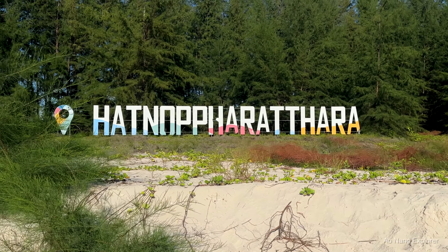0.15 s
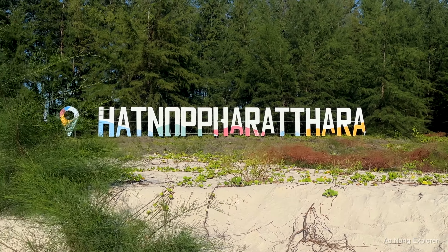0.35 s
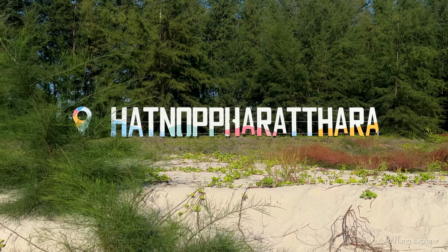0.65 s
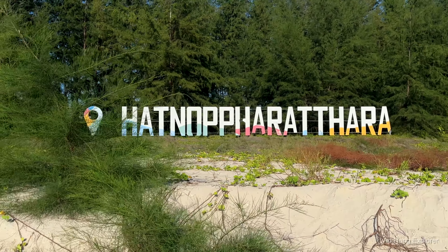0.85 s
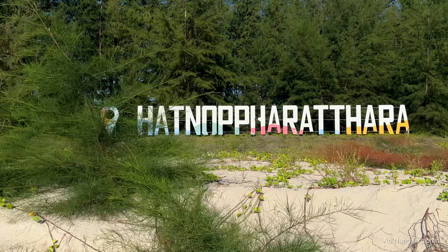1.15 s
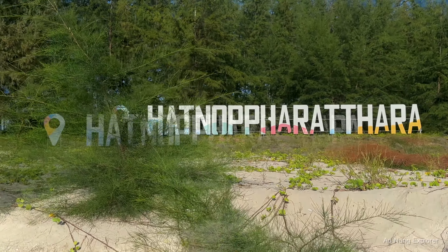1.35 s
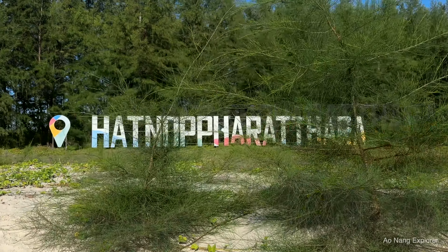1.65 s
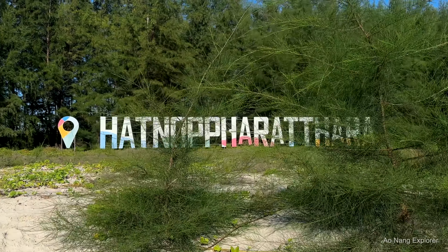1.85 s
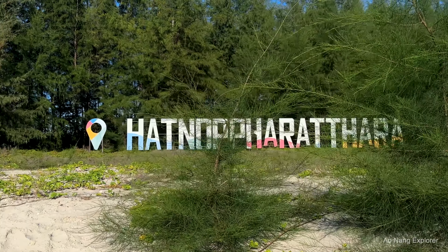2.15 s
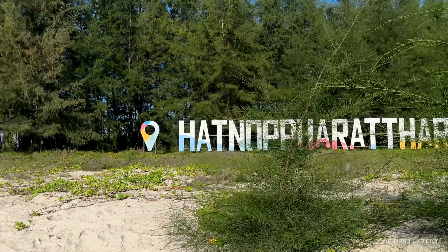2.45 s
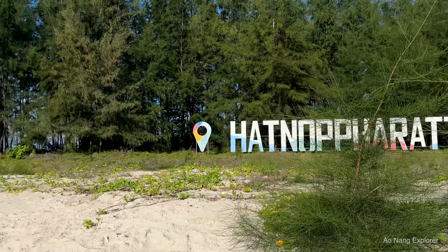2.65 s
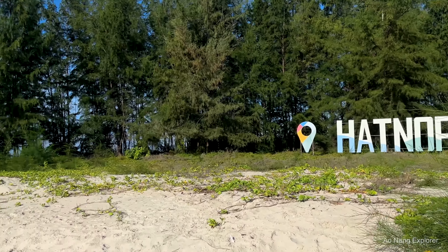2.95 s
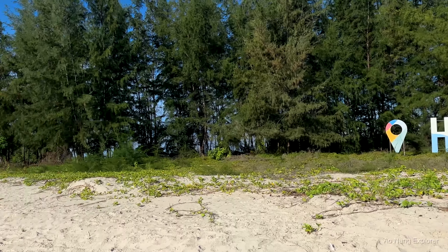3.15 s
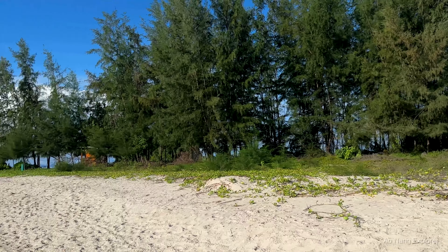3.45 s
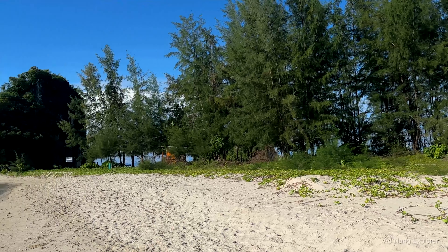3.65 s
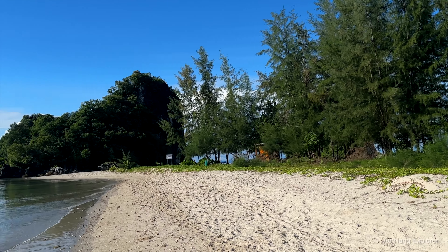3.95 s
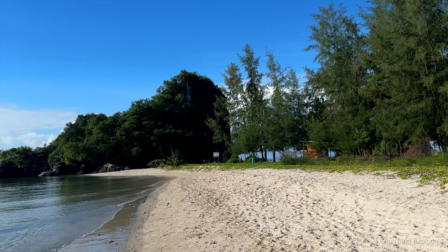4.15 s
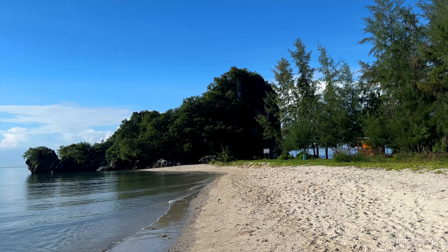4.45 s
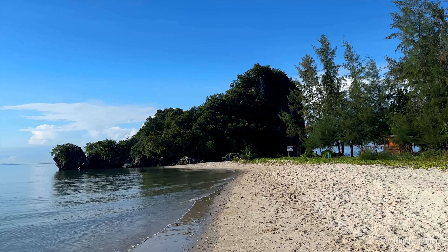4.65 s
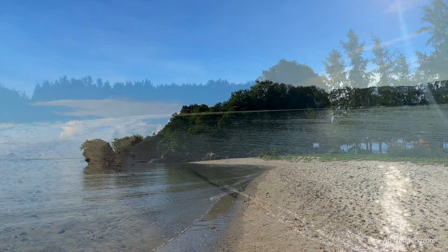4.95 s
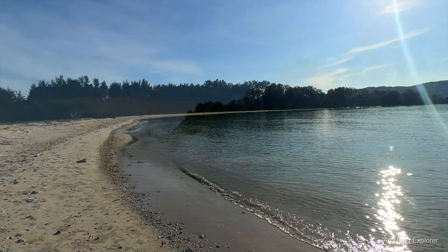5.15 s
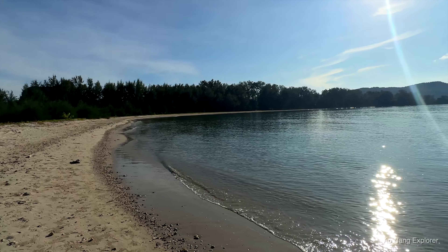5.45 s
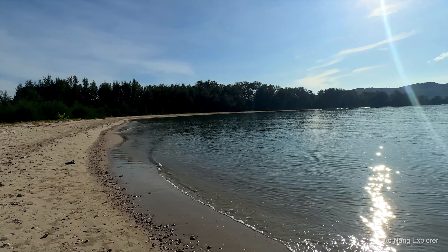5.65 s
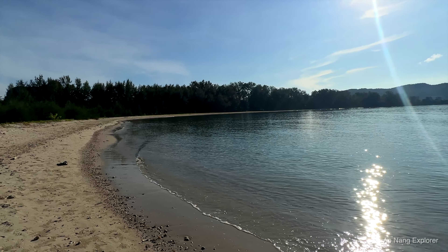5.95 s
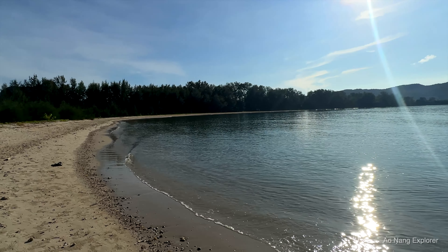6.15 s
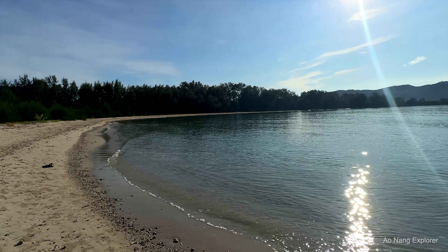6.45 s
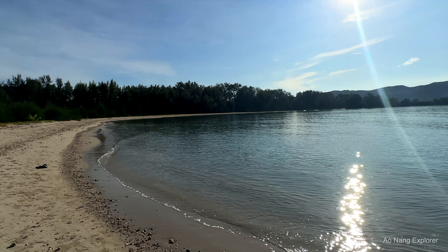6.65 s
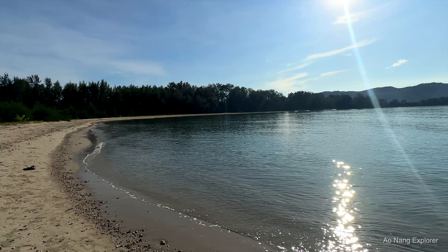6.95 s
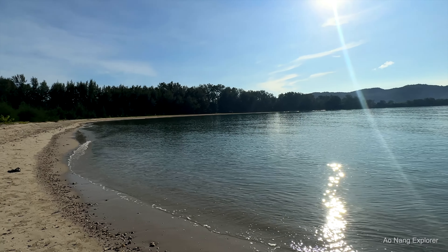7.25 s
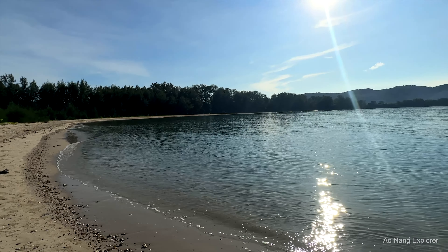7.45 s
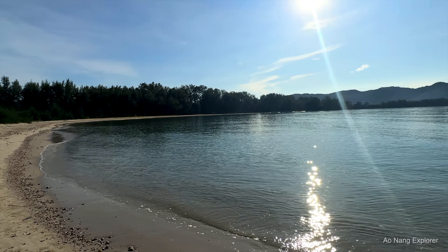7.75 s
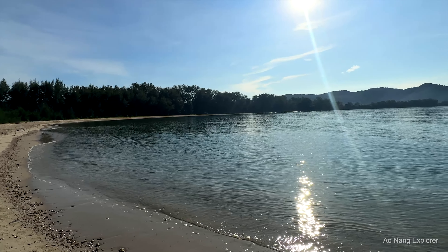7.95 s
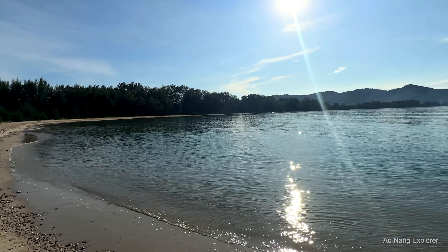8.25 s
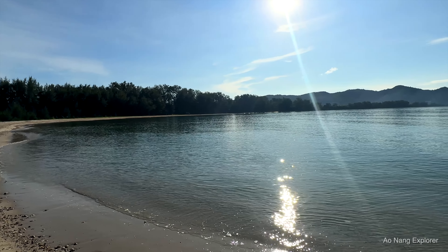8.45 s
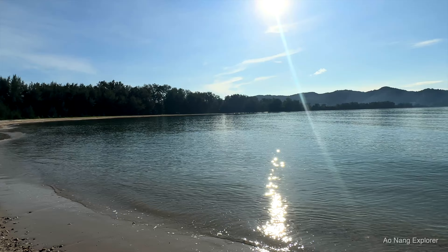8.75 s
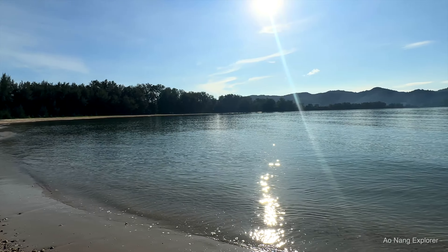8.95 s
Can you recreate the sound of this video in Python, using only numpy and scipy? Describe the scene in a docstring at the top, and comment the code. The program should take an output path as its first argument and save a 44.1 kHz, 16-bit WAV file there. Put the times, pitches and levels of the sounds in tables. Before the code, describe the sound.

Low beating drone of far-off motor boats under soft water wash, bubbly gurgles, a few dry woody clicks and faint high cicadas.

```python
"""A calm sandy bay, heard in turn from among the trees, on the open sand and at the water's edge.
Far long-tail boats drone on the left: harmonics of three firing rates beat over shaped-noise rumble.
Ripples wash, slap and gurgle at the shore: filtered random impulses and noise, with ringing bubbles.
A few dry woody clicks are decaying, falling tones; cicadas are click noise shaped into a shrill band,
with single tones standing out. Two closely spaced microphone ports hear the water from the left."""
import sys
import numpy as np
from scipy import signal
from scipy.fft import rfft, irfft, next_fast_len
from scipy.io import wavfile
from scipy.ndimage import uniform_filter1d

SR = 44100
rng = np.random.default_rng(int(sys.argv[2]) if len(sys.argv) > 2 else 0)


def inscribe(sig):
    """Save sig as 16-bit PCM at rate SR to the path in sys.argv[1].

    A 1-D sig is mono; a 2-D sig holds one channel per row.
    Samples are clipped to [-1, 1] before scaling.
    """
    pcm = np.round(np.clip(np.atleast_2d(sig).T, -1, 1) * 32767)
    wavfile.write(sys.argv[1], SR, pcm.astype(np.int16))


N = 401310
T = np.arange(N) / SR
SIZE = next_fast_len(N)
FREQS = np.maximum(np.arange(SIZE // 2 + 1) * SR / SIZE, 1)

# Engine speed of the three boats: t/s, firing rate f/Hz
LEAD_SPEED = [(0, 100.6), (.3, 101.1), (1.5, 99.7), (1.65, 98.9), (2.55, 97.7), (3.35, 98.9), (3.75, 100.7),
              (4.2, 99.1), (4.9, 99), (5.1, 103), (5.7, 103.2), (6.38, 105.1), (6.7, 103.7), (6.95, 101.1),
              (7.26, 101.1), (7.95, 104.1), (8.6, 104.7), (9.1, 106.4)]
SECOND_SPEED = [(1.5, 86), (1.7, 87), (1.95, 90.7), (2.29, 91), (2.45, 82), (2.7, 76.5), (3.3, 80.3),
                (4.32, 81.5), (4.53, 83.5), (4.82, 90.7), (5.1, 94), (9.1, 94)]
SLOW_SPEED = [(0, 63.6), (1.3, 65), (1.8, 69), (4.85, 72.3), (5.4, 64), (6.5, 60), (7.5, 62), (8.2, 66)]
# Nearest boat's fundamental, then its second harmonic: level/dB at each of the three spots
LEAD_HARMONIC_DB = [-41, -43.5, -28], [-40, -39, -41]
# Brief fades of the nearest boat's fundamental: t/s, half width/s, depth/dB
LEAD_FADES = [(1.581, 0.1, 8), (4.55, 0.21, 16), (6.12, 0.13, 5.5), (7.62, 0.081, 4), (8.9, 0.16, 3.5)]
# Farther boats' fundamentals, swelling and fading across the water: t/s, level/dB
SECOND_LEVEL = [(1.4, -67), (1.54, -34), (1.68, -32.5), (1.92, -41.5), (2.12, -31.5), (2.38, -40),
                (2.8, -39.5), (3.08, -46), (3.22, -37), (3.45, -40.5), (3.62, -33), (3.88, -46),
                (4.15, -34.5), (4.35, -38), (4.55, -34.5), (4.72, -40.5), (4.87, -32), (5.15, -59)]
SLOW_LEVEL = [(0, -44), (1.3, -49.5), (1.8, -41.5), (2.6, -43.5), (4.5, -43.5), (7.6, -50), (8.2, -42.5),
              (9.1, -41)]
# Weak upper exhaust partials: multiple of the firing rate, level/dB at each of the three spots
LEAD_PARTIALS = [(3, -62, -59.5, -58.5), (4, -72, -72, -57.5), (5, -72, -68, -58), (5.5, -54.5, -70, -80),
                 (6, -52, -64, -59.5), (6.5, -54, -69, -78), (7, -59.5, -78, -66)]
SECOND_PARTIALS = [(3, -90, -58.5, -60), (4, -90, -62, -69)]
# Blurred rumble of farther boats, spectral shape: f/Hz, relative level/dB per Hz
RUMBLE_SPECTRUM = [(20, -43), (32, -21), (45, 6), (60, 7), (85, 13.5), (115, 7), (160, 4), (230, -1),
                   (330, -11.5), (600, -49.5)]
# Rumble: level/dB at each of the three spots
RUMBLE_DB = [-43, -43.5, -41]
# Boats, left minus right: level/dB at each of the three spots
BOAT_LEFT_DB = [2.8, 3, 1.5]
# Farther boats' second harmonics at each of the three spots (dB)
SECOND_OCTAVE_DB, SLOW_OCTAVE_DB = [-85, -53, -44.3], [-60, -65, -59]


def boats():
    """Beating: three engines at different speeds interfere over a dull, partly diffuse rumble."""
    first_db, second_db = map(by_spot, LEAD_HARMONIC_DB)
    first_db = first_db - sum(db * swell(s, width) for s, width, db in LEAD_FADES)
    lead = exhaust(curves(LEAD_SPEED)[0], first_db, second_db, LEAD_PARTIALS,
                   flutter_db=0.6, waver_db=2.0)
    second = exhaust(curves(SECOND_SPEED)[0], curves(SECOND_LEVEL)[0], by_spot(SECOND_OCTAVE_DB),
                     SECOND_PARTIALS, flutter_db=2.0, waver_db=0.3)
    slow = exhaust(curves(SLOW_SPEED)[0], curves(SLOW_LEVEL)[0], by_spot(SLOW_OCTAVE_DB), [],
                   flutter_db=1.5, waver_db=7.0)
    # the deepest rumble is alike at both ports; higher up it arrives from all around
    scattered = filtered(rng.standard_normal((2, N)), np.minimum(FREQS / 200, 1))
    rumble = place(grains(900, 1.4), 0.81, 0) + scattered
    rumble = unit(filtered(rumble, shape(RUMBLE_SPECTRUM))) * undb(by_spot(RUMBLE_DB))
    left_db = by_spot(BOAT_LEFT_DB)
    return (place(lead + second + slow, 1.33, 0) + rumble) * undb(np.array([left_db, -left_db]) / 2)


WAVER_HZ = 2.7  # mean rate at which a second harmonic swells on its way across the water


def exhaust(hz, first_db, second_db, partials, flutter_db, waver_db):
    """Harmonic series: distance leaves mainly the low harmonics of the periodic firing pulses."""
    phase = 2 * np.pi * (np.cumsum(hz) / SR + rng.random())
    waver = np.sin(2 * np.pi * WAVER_HZ * T + 2 * walk(2))
    out = undb(first_db + flutter_db * walk(15)) * np.sin(phase)
    out += undb(second_db + flutter_db * walk(17) + waver_db * waver) * np.sin(2 * phase)
    for multiple, *db in partials:
        partial = np.sin(multiple * phase + .2 * walk(4))
        out += undb(by_spot(db) + 1.5 * walk(5)) * partial
    return np.sqrt(2) * out  # levels are rms


# Spectral shapes of water, foam and finest spray: f/Hz, relative level/dB per Hz
WATER_SPECTRUM = [(170, -34), (260, -6), (330, -5), (430, -7.5), (620, -4), (850, -5.5), (1200, -7.5),
                  (1900, -13.5), (2600, -14), (3100, -16), (3550, -18), (4200, -17), (5300, -26),
                  (6500, -38)]
FOAM_SPECTRUM = [(4500, -14), (6500, -6), (7600, 9), (8400, 10.5), (9300, 3.5), (10200, 7), (11800, -9.5),
                 (15000, -22), (16000, -29)]
FIZZ_SPECTRUM = [(7000, -25), (10000, -6), (13500, -2), (15200, -2), (16000, -12)]
# Bands standing out for a while: start t/s, end t/s, centre f/Hz, half width at -6 dB f/Hz, level/dB
WASH_BANDS = [(0, 2.9, 2500, 200, -61), (3.4, 5, 3350, 300, -56), (0, 1.5, 4170, 250, -63),
              (1.5, 2.96, 1460, 140, -53), (3.6, 4.6, 890, 120, -50.5), (3.4, 4.45, 1850, 96, -53.5),
              (3.6, 4.95, 5600, 360, -52), (7, 7.7, 1100, 300, -51.5)]
FROTH_S, FROTH_WIDTH_S = 4.3, 0.88  # the frothiest wash wets the sand: crest and half width
FIZZ_DB, FIZZ_SHARE_DB = -69, -20.5  # added at the frothiest crest; always present, against the foam


def wash():
    """Superposition: countless bubbles and splashes merge to noise whose bands swell independently."""
    body_db, splash_db, foam_db = wash_levels()
    body, splash = np.zeros((2, N)), np.zeros((2, N))
    colour = shape(WATER_SPECTRUM)
    for hz in 250 * 2 ** np.arange(0, 5, .5):
        band = np.cos(np.pi / 2 * np.clip(2 * np.log2(FREQS / hz), -1, 1))
        near = place(grains(2500, 2.44) * undb(2 * walk(22)), 0.87, 4.0 if hz < 1200 else 1.6)
        far = rng.standard_normal((2, N))
        layer = body if hz < 1200 else splash
        layer += filtered(near + far, band * colour)
    droplets = place(grains(6000, 3), 0.693, .3)
    spray = (droplets + undb(2.0) * rng.standard_normal((2, N))) * undb(1.2 * walk(18))
    foam = unit(filtered(spray, shape(FOAM_SPECTRUM))) * undb(foam_db)
    # one frothy ripple throws up extra fine spray
    mist = spray + undb(5) * grains(5000, 2.2) * undb(walk(14))
    fizz_gain = undb(foam_db + FIZZ_SHARE_DB) + undb(FIZZ_DB) * swell(FROTH_S, FROTH_WIDTH_S)
    fizz = unit(filtered(mist, shape(FIZZ_SPECTRUM))) * fizz_gain
    bands = sum(narrow_band(*row, side=0.81, left_db=10.0) for row in WASH_BANDS)
    return unit(body) * undb(body_db) + unit(splash) * undb(splash_db) + foam + fizz + bands


def narrow_band(start, end, hz, width, db, side, left_db):
    """Resonance: a fine, fluttering hiss that fades in and out, part direct and part scattered."""
    resonance = 1 / (1 + 1j * (FREQS - hz) / width) ** 2
    fade = np.clip((T - start) / 0.072 + 1, 0, 1) * np.clip((end - T) / 0.1 + .5, 0, 1)
    clicks = place(grains(1800, 1), side, left_db) + undb(-4) * rng.standard_normal((2, N))
    flutter = undb(2 * walk(32))
    return unit(filtered(clicks, resonance) * flutter) * fade * undb(db)


# Ripples running up the sand: crest t/s, half width/s, body level/dB, splash level/dB, foam level/dB
RIPPLES = [(.8, 0.21, -51, -47.5, -63), (1.22, 0.15, -45, -49.5, -59), (1.505, .035, -59, -52, -58),
           (3.951, 0.43, -50, -48.5, -57.5), (4.72, 0.2, -51, -45.5, -58.5), (7.0, 0.037, -51, -48, -61),
           (7.15, 0.24, -47, -53, -69), (8.501, 0.52, -62, -56, -63)]
# wash between ripples at each of the three spots (dB)
BODY_DB, SPLASH_DB, FOAM_DB = [-45.5, -48, -47], [-48, -48, -47.5], [-66.5, -67, -65]


def wash_levels():
    """Incoherent addition: every ripple adds its power to the resting wash; body, splash, foam in dB."""
    power = undb([by_spot(BODY_DB), by_spot(SPLASH_DB), by_spot(FOAM_DB)]) ** 2
    for s, width, *db in RIPPLES:
        power = power + np.outer(undb(db) ** 2, swell(s, width))
    return 10 * np.log10(power)


def trickle(count=520):
    """Bubble resonance: small bubbles ring at random in the wash, louder where it splashes more."""
    out, splash_db = np.zeros(N), wash_levels()[1]
    for when, pitch, size in rng.random((count, 3)):
        hz = 500 * 8 ** pitch
        db = splash_db[int(when * N)] - 6.5 + 12 * size ** 3
        add(out, when * T[-1], undb(db) * bubble(hz, 45 / hz, rise=0.2))
    return place(out, 0.84, 14.0)


def prickle(count=300):
    """Bubble resonance: tiny bubbles burst one by one on the wet sand, following the splash level."""
    out, splash_db = np.zeros(N), wash_levels()[1]
    for when, pitch, size in rng.random((count, 3)):
        hz = 2200 * 2.4 ** pitch
        db = splash_db[int(when * N)] - 6 + 11 * size ** 3
        add(out, when * T[-1], undb(db) * bubble(hz, 60 / hz, rise=0.11))
    return place(out, 0.54, 2.5)


# bubbles under a ripple: faintest level against its body, middle pitch, t60 in cycles
CHURN_FAINTEST_DB, CHURN_HZ, CHURN_CYCLES = -8.6, 833, 32


def churn(count=26):
    """Air entrainment: each ripple folds air under; pockets ring in a loose cluster round its crest."""
    out = np.zeros(N)
    for s, width, body_db, _, _ in RIPPLES:
        for early, late, pitch, size in rng.random((count, 4)):
            hz = CHURN_HZ * 2 ** (2.6 * (pitch - .5))
            when = np.clip(s + 1.5 * width * (late - early), 0, T[-1])
            db = body_db + CHURN_FAINTEST_DB + 7.4 * size ** 2
            add(out, when, undb(db) * bubble(hz, CHURN_CYCLES / hz, rise=0.22))
    return place(out, 0.45, 7.5)


# Ripples slapping the sand: t/s, relative level/dB, cavity pitch f/Hz, ring t60/s
SLAPS = [(0.4205, -38.5, 1280, 0.05), (0.8225, -39, 2450, 0.02), (1.045, -37, 620, 0.05),
         (1.066, -42, 1000, .03), (1.0825, -28.5, 600, 0.022), (1.12, -38, 520, 0.042),
         (1.1505, -39, 760, .02), (1.211, -29.5, 570, 0.024), (1.227, -36, 600, 0.02),
         (1.272, -42, 720, .03), (1.2987, -30, 730, 0.03), (1.316, -39, 900, .03),
         (1.328, -34.5, 474, 0.05), (1.338, -39, 696, 0.04), (1.357, -40, 680, .03),
         (1.5, -43, 1660, 0.046), (1.519, -37, 450, 0.049), (2.817, -39, 480, 0.038),
         (3.812, -39, 620, 0.048), (4.012, -37.5, 820, 0.03), (4.65, -44, 476, 0.074),
         (4.9, -39.5, 460, 0.04), (6.995, -43, 880, .04), (7.32, -41, 1050, 0.03), (8.737, -40, 1100, 0.03),
         (8.7485, -40, 1970, .026)]
# Air pockets gurgling: t/s, relative level/dB, starting pitch f/Hz, ring t60/s
GURGLES = [(0.823, -41, 2400, 0.035), (.8412, -32, 1380, 0.032), (1.047, -39, 554, 0.051),
           (1.074, -34, 790, 0.038), (1.151, -28.5, 703, 0.04), (1.12, -40, 1550, .035),
           (1.127, -47, 2300, .035), (1.17, -41.5, 2740, 0.052), (1.331, -47, 1330, .05),
           (4.399, -37, 1780, 0.038), (3.645, -40, 1750, 0.034), (3.79, -37, 980, .045),
           (3.875, -44, 1890, .04), (4.095, -35, 900, 0.044), (4.16, -37, 870, .05),
           (4.535, -42, 1920, .05), (1.536, -37, 560, .06), (4.905, -45, 500, 0.061),
           (4.932, -49, 443, .08), (0.795, -38, 1900, 0.039), (1.533, -41, 2750, 0.036),
           (3.845, -37, 960, 0.044), (3.985, -50, 1800, 0.035), (4.635, -43, 2310, 0.041),
           (4.772, -40, 1100, .04), (4.873, -39, 1480, .04), (1.215, -38, 483, 0.069),
           (1.229, -38.5, 321, 0.21), (1.305, -41, 605, 0.1), (1.332, -50, 420, 0.15),
           (1.519, -44, 505, 0.045), (1.552, -38.5, 696, 0.065), (1.5, -51, 1650, .04),
           (2.04, -37, 488, 0.073), (4.38, -42, 1970, 0.06), (4.811, -39.5, 2270, 0.053),
           (7.0, -40, 1830, 0.033), (7.03, -41, 920, 0.046), (7.12, -41, 1145, 0.043),
           (7.319, -54, 1000, 0.028), (8.577, -33, 1270, 0.036), (3.812, -37, 556, 0.046),
           (4.034, -29.5, 332, 0.041), (4.563, -41, 472, 0.094), (4.63, -39, 426, .08),
           (4.665, -39, 370, 0.22), (4.902, -31, 356, 0.16)]
# Tiny bubbles bursting: t/s, relative level/dB, pitch f/Hz, ring t60/s
POPS = [(4.263, -28, 11000, 0.002), (4.612, -41, 8300, .014), (4.703, -26, 8400, 0.0074),
        (4.786, -44, 13100, 0.0037), (4.899, -20.5, 4600, 0.0039), (.877, -33, 5000, .014),
        (.984, -38, 4300, .03), (1.117, -39, 4170, .03), (1.495, -38, 4300, 0.037), (7.0, -47, 10000, .005),
        (7.575, -41, 9400, .005), (8.607, -40, 8600, .014), (8.786, -40, 8800, .009),
        (8.96, -32.5, 3900, 0.011), (9.037, -38, 3770, 0.025)]
# a slap's first contact: pitch above the cavity's, t60, share of pitch lost
KNOCK_ABOVE_HZ, KNOCK_S, KNOCK_SAG = 720, .009, 1.2


def lapping():
    """Impact and cavity resonance: near ripples slap with a falling knock, then gurgle and pop."""
    slaps, gurgles, pops = np.zeros((3, N))
    for s, db, hz, t60 in SLAPS:
        add(slaps, s, undb(db) * bubble(hz + KNOCK_ABOVE_HZ, KNOCK_S, rise=-KNOCK_SAG))
        add(slaps, s + .001, undb(db) * splat(hz, t60, spray_db=-13, crack_db=-20))
        slaps += spill(s, db, hz)
    for s, db, hz, t60 in GURGLES:
        add(gurgles, s, undb(db) * bubble(hz, t60, rise=0.517))
    for s, db, hz, t60 in POPS:
        add(pops, s, undb(db + 2.0) * splat(hz, t60, spray_db=-23, crack_db=-27))
    return place(slaps * undb(6.3) + gurgles * undb(2), 0.88, 10.4) + place(pops, 0.16, .3)


# bubbles after a slap: mean delay, loudest level against it, pitch spread
SPILL_S, SPILL_DB, SPILL_OCTAVES = 0.033, -11.5, 1.86


def spill(s, db, hz, count=7):
    """Air entrainment: a slap folds air under, and a few more pockets ring just after it."""
    out = np.zeros(N)
    for wait, pitch, size in rng.random((count, 3)):
        ring_hz = hz * 2 ** (SPILL_OCTAVES * (pitch - .1))
        ring_db = db + SPILL_DB - 6.1 * size - 4 * pitch
        add(out, s + 2 * SPILL_S * wait, undb(ring_db) * bubble(ring_hz, 22 / ring_hz, rise=0.26))
    return out


def bubble(hz, t60, rise):
    """Damped resonance: a trapped air pocket climbs in pitch near the surface; negative rise falls."""
    t = np.arange(int(SR * max(t60, .002))) / SR
    age = t / t[-1]
    return np.sin(2 * np.pi * hz * t * (1 + rise * age / 2)) * np.exp(-np.log(1000) * age)


def splat(hz, t60, spray_db, crack_db):
    """Impulsive excitation: a brief crack, then a small cavity rings under a fading noise burst."""
    ring = bubble(hz, t60, rise=0.049)
    t = np.arange(len(ring)) / SR
    envelope = undb(spray_db) * np.exp(-7 * t / t60) + undb(crack_db) * np.exp(-t / 0.00032)
    burst = rng.standard_normal(len(t)) * envelope
    low, high = hz * .47, min(hz * 2.6, .46 * SR)
    burst = signal.sosfilt(signal.butter(3, [low, high], "band", fs=SR, output="sos"), burst)
    # the cavity takes about half a cycle to start ringing
    return ring * (1 - np.exp(-2 * hz * t)) + burst * np.sqrt(SR / 2 / (high - low))


# Dry clicks close by: t/s, level/dB, starting pitch f/Hz, ring t60/s, first tick level/dB, its lead t/s
CLICKS = [(0.2500, -22.5, 1300, .016, -35, .0028), (0.3045, -30.5, 1400, 0.011, -46, .001),
          (0.8702, -24, 1450, 0.012, -31, .0005), (0.8778, -33, 2600, .012, -36, .0005),
          (0.8876, -21.5, 1600, 0.011, -20.5, .0003), (2.8982, -22.5, 900, 0.008, -31, .0012),
          (8.753, -36, 3000, .014, -34, .001)]
CLICK_SAG, TICK_HZ = 1, 3230  # share of pitch lost while ringing; pitch of the light first contact


def dry_clicks():
    """Damped impact: short woody clicks from nearly ahead, a light tick and then a falling knock."""
    out = np.zeros(N)
    for s, db, hz, t60, tick_db, lead_s in CLICKS:
        add(out, s - lead_s, undb(tick_db) * splat(TICK_HZ, 0.0027, spray_db=-12, crack_db=-9))
        add(out, s, undb(db) * bubble(hz, t60, rise=-CLICK_SAG))
        add(out, s, undb(db - 23) * splat(hz, t60, spray_db=12, crack_db=6.0))
    return place(out, 0.13, 1.6)


# Cicada chorus, spectral shape: f/Hz, relative level/dB per Hz
CHORUS_SPECTRUM = [(5000, -41), (5350, -15), (5700, -5.5), (6050, -3), (6330, 0), (6480, -12), (6680, -5),
                   (6830, -14.5), (6980, -4), (7100, -24), (7300, -14.5), (7550, -50.5)]
# Chorus: level/dB at each of the three spots
CHORUS_DB = [-48, -46.5, -47]
# Single cicadas standing out: start t/s, end t/s, pitch f/Hz, pitch wander f/Hz, level/dB
SINGERS = [(0, .9, 5950, 10, -55), (0, 1.5, 6095, 10, -53.5), (0, 1.2, 6380, 16, -57),
           (.4, 1.4, 6715, 9, -58), (0, 1.5, 7020, 14, -60), (1.6, 2.8, 5745, 11, -57),
           (1.6, 2.9, 6250, 45, -54), (2.25, 2.7, 6250, 45, -52), (2.95, 3.16, 6335, 24, -45.5),
           (3.3, 4.9, 6330, 35, -54), (3.3, 4.8, 6060, 22, -57), (5.1, 6.4, 5932, 12, -58),
           (5.1, 6.3, 6262, 24, -55), (5.8, 7.1, 5986, 12, -59), (5.8, 6.5, 6616, 12, -61),
           (5.1, 8, 5680, 18, -62), (1.7, 9.3, 6960, 22, -61), (5.3, 8.2, 6935, 15, -56.5),
           (7.6, 9.3, 5800, 12, -60), (8.1, 9.3, 5820, 8, -55)]


def cicadas():
    """Forced resonance: tymbal clicks ring many insects' bodies, merging to a band with a few voices."""
    around = np.array([undb(4.0) * grains(9000, 0.5), grains(9000, 3.0)])
    clicks = place(grains(9000, 0.85), 0.97, 2.8) + undb(-0.5) * around
    chorus = unit(filtered(clicks, shape(CHORUS_SPECTRUM))) * undb(by_spot(CHORUS_DB))
    return chorus + place(sum(singer(*row) for row in SINGERS), 1.037, 4.1)


def singer(start, end, hz, wander_hz, db):
    """Frequency and amplitude modulation: a thin, restless body tone rattles with tymbal strokes."""
    wandering_hz = hz + wander_hz * (walk(170) + .4 * walk(3))
    tone = np.sin(2 * np.pi * np.cumsum(wandering_hz) / SR)
    rattle = undb(3 * walk(320) + 1.5 * walk(20))
    fade_s = .07 + .15 * (end - start)  # long calls fade slowly
    fade = np.clip((T - start) / fade_s + .8, 0, 1) * np.clip((end - T) / fade_s + .6, 0, 1)
    return unit(tone * rattle) * fade * undb(db)


# Moves between the three spots (trees, open sand, water's edge): t/s
MOVES_S = [1.52, 5.04]
MOVE_FADE_S = 0.16


def by_spot(values):
    """Linear crossfade: a value for each listening spot, blended briefly at each move."""
    moved = [np.clip((T - s) / MOVE_FADE_S + .5, 0, 1) for s in MOVES_S]
    return values[0] + np.diff(values) @ np.array(moved)


PORT_LAG_MS = 0.4634


def place(x, side, left_db):
    """Inter-port time and level difference: side 1 leads on the left by the full port lag."""
    lead = np.exp(1j * np.pi * FREQS * side * PORT_LAG_MS * 1e-3)
    left = filtered(x, lead) * undb(left_db / 2)
    right = filtered(x, 1 / lead) * undb(-left_db / 2)
    return np.array([left, right])


def grains(rate, spread_db):
    """Shot noise: dense random impulses at a mean rate per second, a few much larger than the rest."""
    sizes = undb(spread_db * np.minimum(rng.exponential(size=N), 5))
    return unit((rng.random(N) < rate / SR) * sizes * rng.standard_normal(N))


def walk(rate):
    """Band-limited randomness: smooth chance with a spread near 1, renewed at this rate in Hz."""
    k = int(SR / rate)
    held = np.repeat(rng.standard_normal(N // k + 2), k)
    return 1.31 * uniform_filter1d(uniform_filter1d(held, k), k)[:N]


def swell(s, width):
    """Gaussian envelope: a smooth rise and fall around time s, 1 at its crest."""
    return np.exp(-((T - s) / width) ** 2)


def undb(db):
    """Logarithmic level: decibels to amplitude gain."""
    return 10 ** (np.asarray(db) / 20)


def unit(x):
    """Normalisation: scale to rms 1."""
    return x / np.sqrt(np.mean(x ** 2))


def curves(table):
    """Linear interpolation: the columns of a table, joined by straight lines in time."""
    s, *columns = np.transpose(table)
    return [np.interp(T, s, c) for c in columns]


def shape(points):
    """Spectral envelope: gain at every frequency, interpolated in dB over log frequency."""
    hz, db = np.transpose(points)
    return undb(np.interp(np.log(FREQS), np.log(hz), db))


def filtered(x, gain):
    """Linear filtering: multiply the spectrum by a frequency response."""
    return irfft(rfft(x, SIZE) * gain, SIZE)[..., :N]


def add(track, s, sound):
    """Superposition: mix a short sound in at time s."""
    i = int(s * SR)
    track[i:i + len(sound)] += sound[:N - i]


SAND_DELAY_MS, SAND_ECHO_GAIN = 1.054, 0.13  # reflection of the wash off smooth wet sand; gain at the crest


def scene():
    """Comb filtering: the wet sand's delayed reflection colours the wash among boats, shore and trees."""
    water = wash() + trickle() + prickle() + churn()
    echo = filtered(water, np.exp(-2j * np.pi * FREQS * SAND_DELAY_MS * 1e-3))
    reflection = SAND_ECHO_GAIN * swell(FROTH_S, FROTH_WIDTH_S) * echo
    return boats() + water + reflection + lapping() + dry_clicks() + cicadas()


TOP_HZ = 15500


def record(dry):
    """Low-pass filtering: a steep elliptic filter cuts the highest treble."""
    return signal.sosfilt(signal.ellip(10, .1, 80, TOP_HZ, fs=SR, output="sos"), dry)


dry = scene()
out = record(dry)
inscribe(out)
```